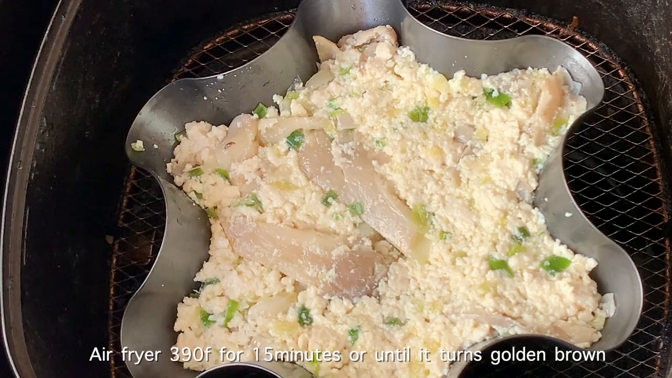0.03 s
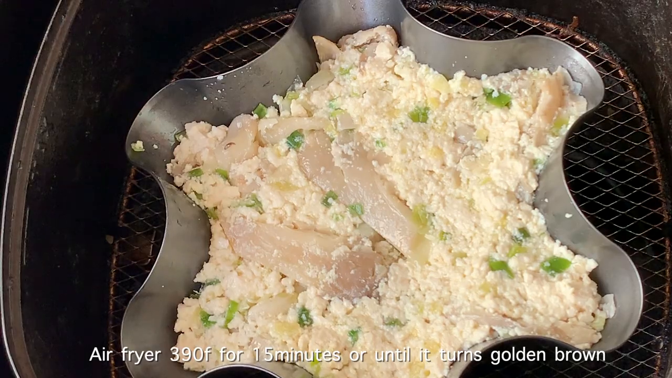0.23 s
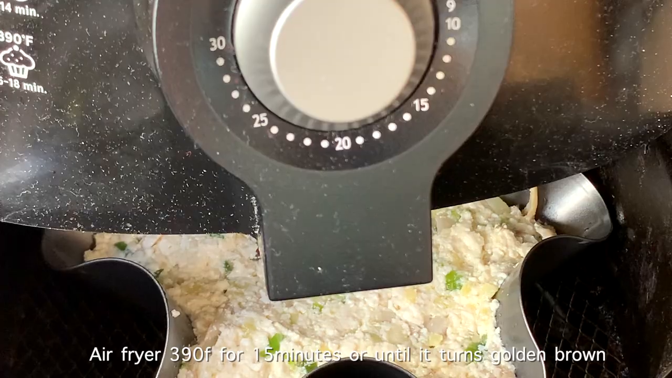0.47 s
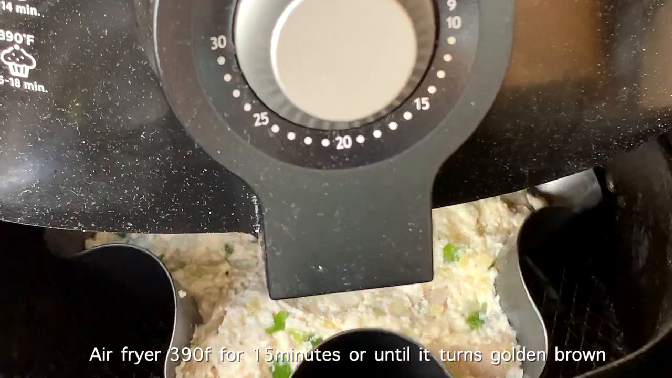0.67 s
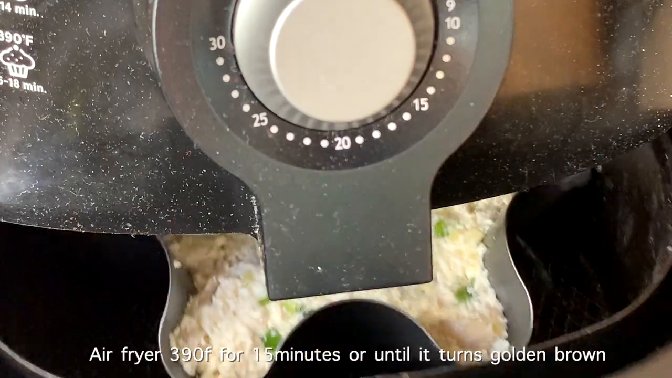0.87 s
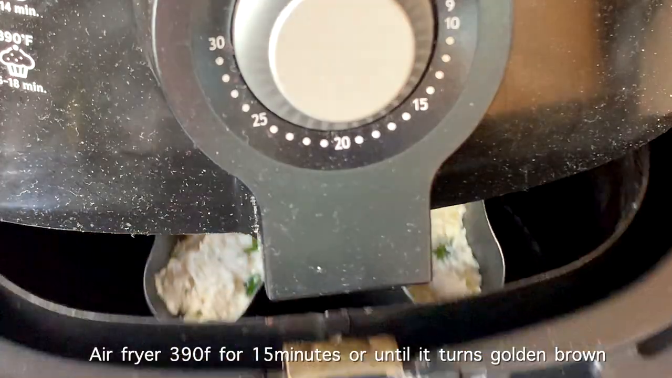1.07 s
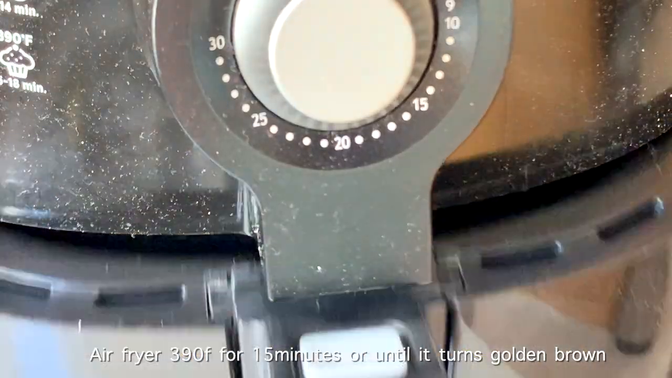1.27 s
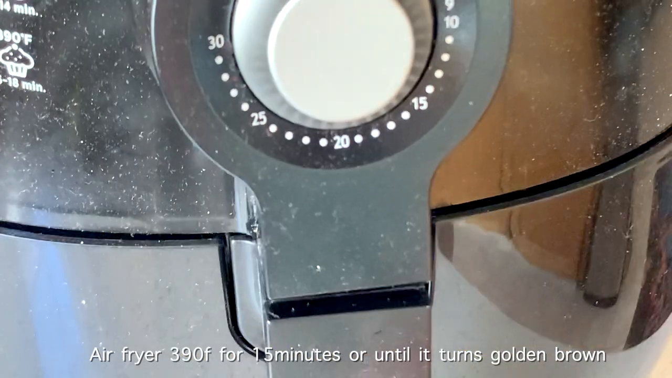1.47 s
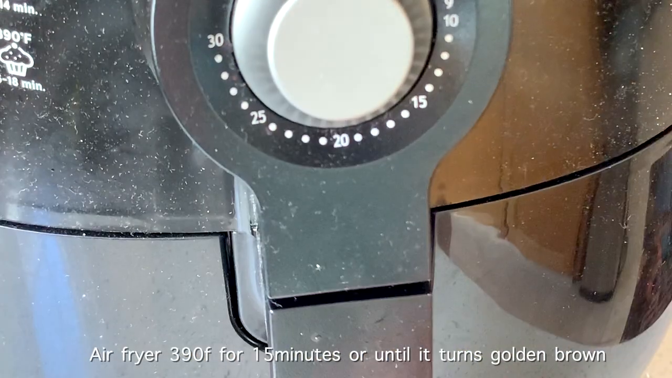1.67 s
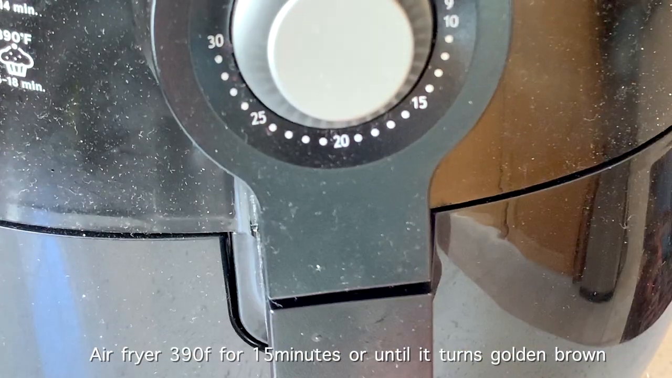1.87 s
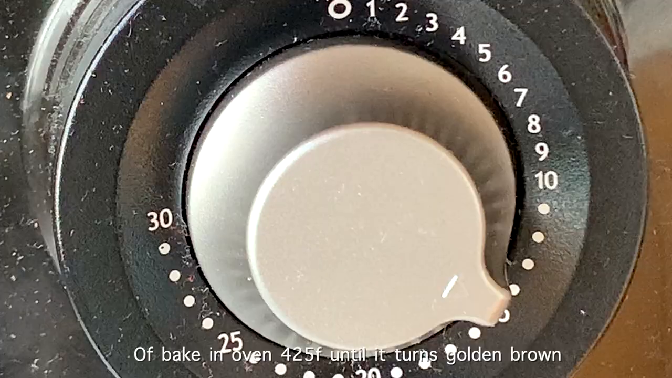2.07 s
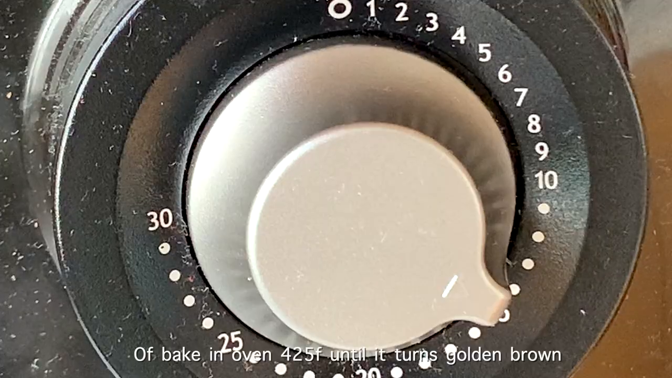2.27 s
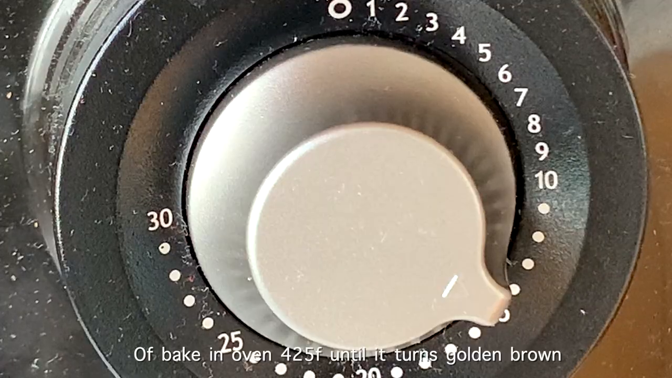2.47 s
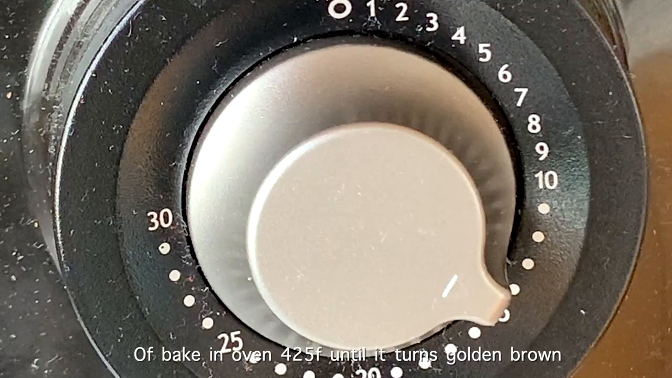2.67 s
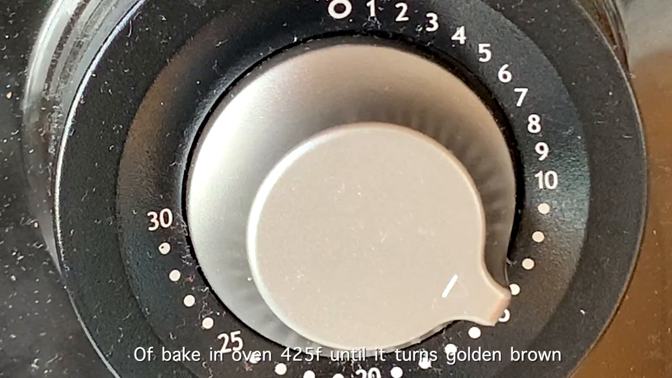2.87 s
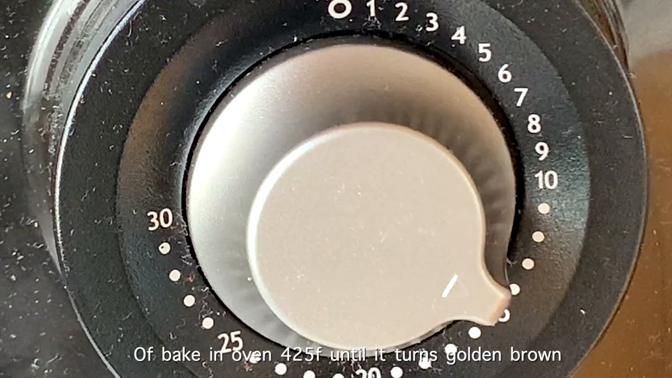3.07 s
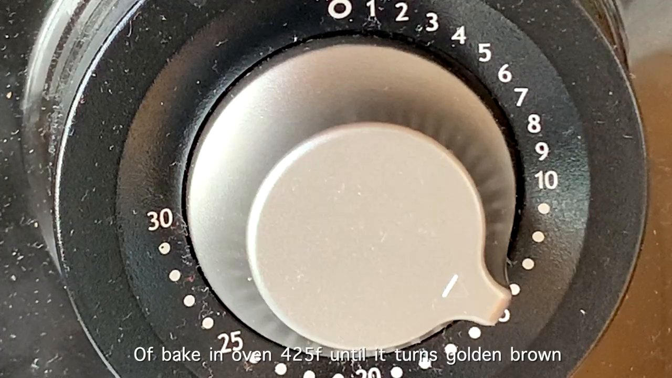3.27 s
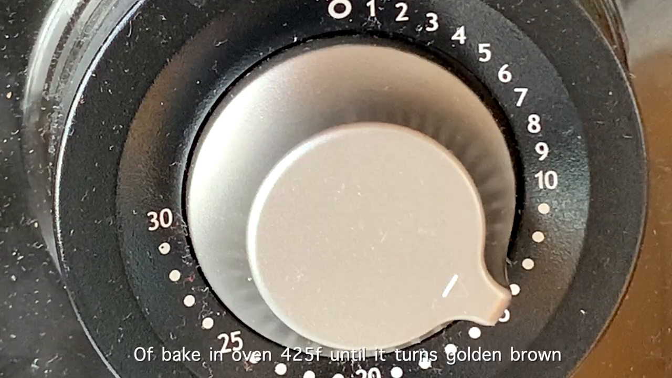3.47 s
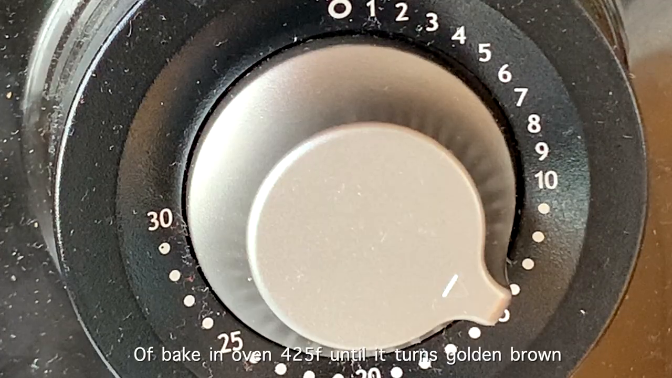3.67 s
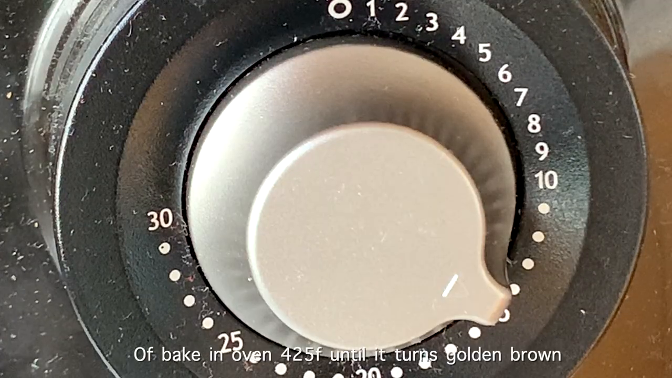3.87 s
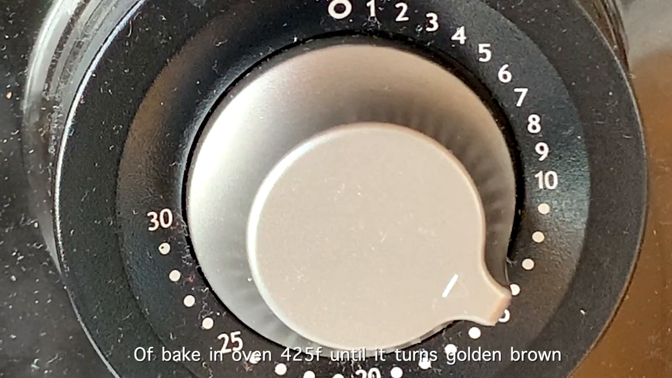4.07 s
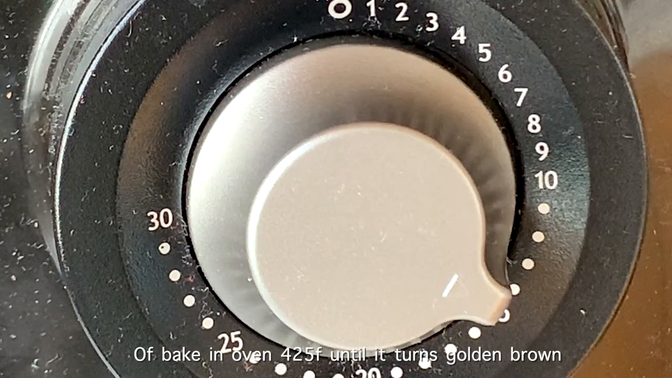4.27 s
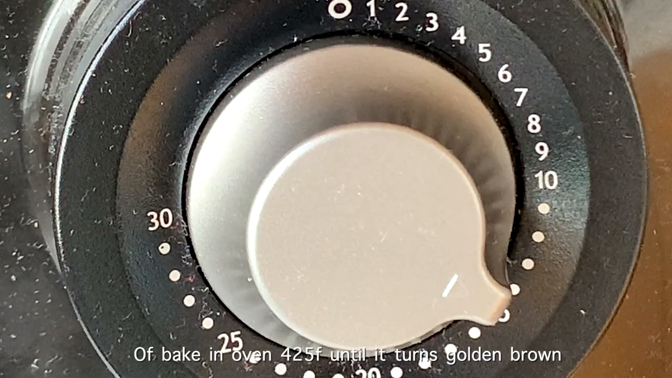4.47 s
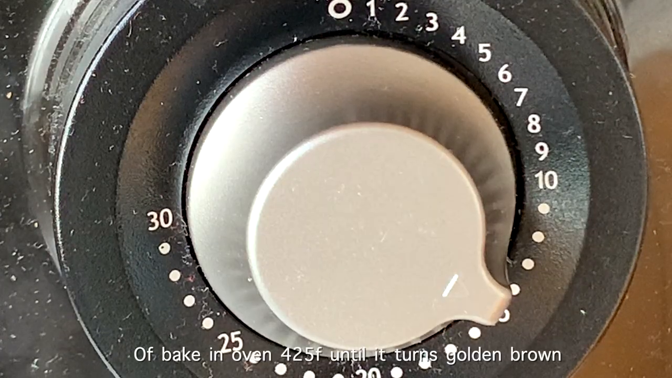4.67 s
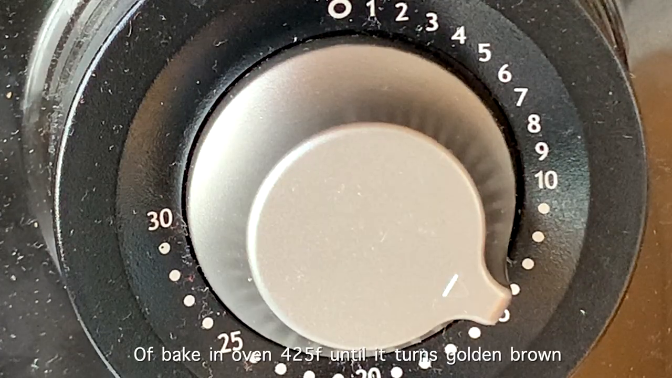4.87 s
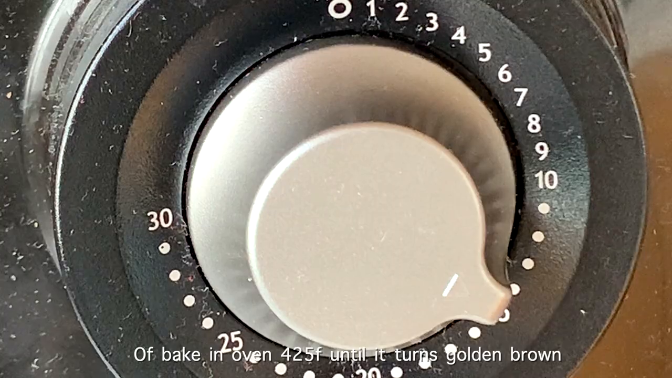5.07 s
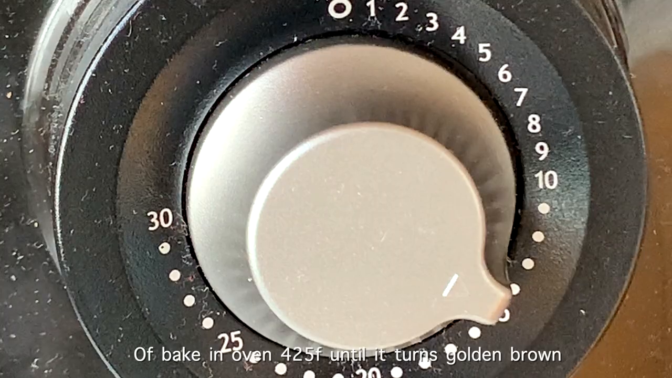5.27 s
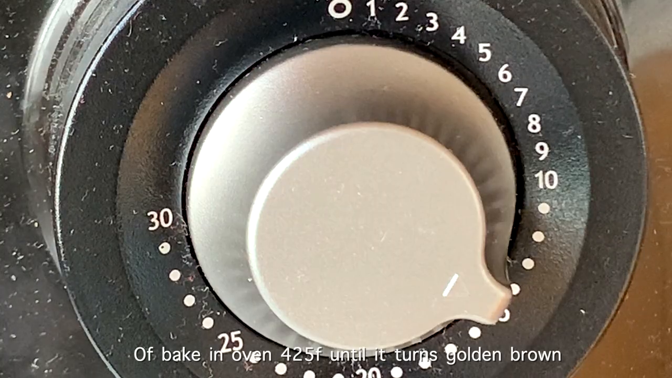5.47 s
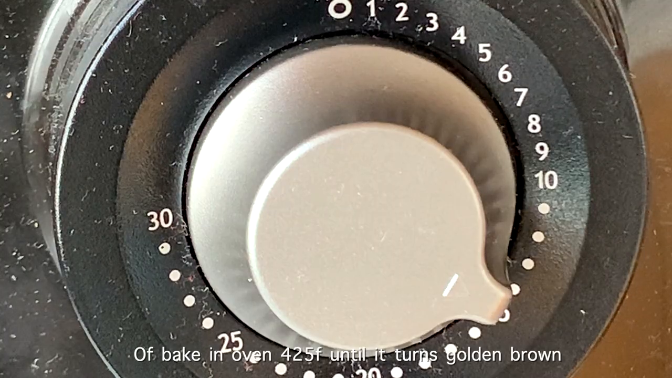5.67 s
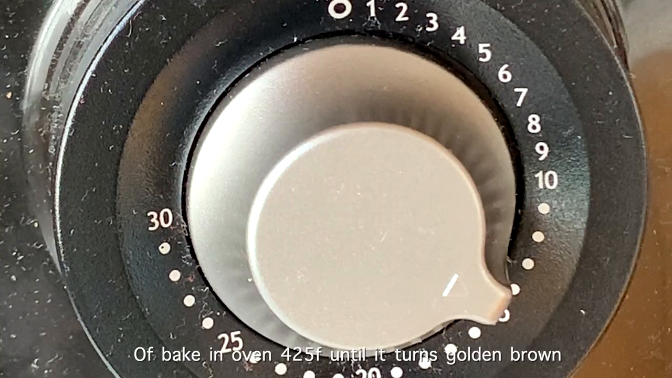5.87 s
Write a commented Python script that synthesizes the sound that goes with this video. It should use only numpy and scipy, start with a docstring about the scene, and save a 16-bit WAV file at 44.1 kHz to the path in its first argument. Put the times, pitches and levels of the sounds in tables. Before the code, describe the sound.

Quiet kitchen, light metallic bumps, a plastic drawer snapping and thumping closed, then an abrupt, steady air fryer whir with a thin hiss.

```python
"""An air fryer's drawer, with a metal pan in it, is pushed home in a small kitchen, then the fan runs. Drawer:
struck modes ring, shaped noise clacks, rubs and snaps as it bumps along the rails, hits the housing and passes
the catches. Fan: coloured noise roars and hisses in the shell, shaft multiples hum and whine, and narrow
resonances whirr; the fan sound comes in abruptly at full level. A hand-held phone gets small bumps; an abrupt
faint click is heard early on; faint kitchen noise lies below."""
import sys
import numpy as np
from scipy import signal
from scipy.fft import rfft, irfft
from scipy.io import wavfile
from scipy.ndimage import uniform_filter1d

SR = 44100
rng = np.random.default_rng(int(sys.argv[2]) if len(sys.argv) > 2 else 0)


def bounce(signal):
    """Save signal as a 16-bit WAV file at the path given by the first command-line argument."""
    frames = np.transpose(np.atleast_2d(signal))
    limited = np.clip(frames, -1, 1)
    pcm = np.round(limited * 32767).astype(np.int16)
    wavfile.write(sys.argv[1], SR, pcm)


N = 261504
T = np.arange(N) / SR
HZ = np.maximum(np.arange(N // 2 + 1) * SR / N, 1)
FAN_ON_S = 2.1035

# plastic clack spectrum: freq_hz, density_db_per_hz
CLACK_SPECTRUM = [(50, -9), (230, 10), (600, 3.5), (950, 2), (1300, 1.5), (1800, -2.5), (2800, -11),
                  (3900, -12.5), (5500, -17), (10000, -25.5), (16000, -42.5)]
# bright snap spectrum: freq_hz, density_db_per_hz
SNAP_SPECTRUM = [(1000, -7.5), (3000, -2), (4000, -7), (6200, -4.5), (9000, -3), (11000, -2), (14000, -6),
                 (16000, -30)]


def basket():
    """Each bump excites pan modes by a landing and random chatter; plastic contacts clack on the rail."""
    # bumps over a rail joint, one foot then the other: landing_s, pan_db, clack_db, snap_db
    bumps = [(0.6627, -34.5, -37.5, -63), (1.0107, -35, -33.5, -40)]
    # graze, landings and rebounds: after_landing_s, level_db
    bump_contacts = [(-.005, -2), (.001, 3.5), (.008, -5), (0.0246, -8.5), (.036, -13)]
    # pan and wire rack modes: freq_hz, t60_s, first_bump_db, second_bump_db
    pan_modes = np.array([(138.3, .25, -16.5, -3.5), (222, 0.58, -3, -16), (256, .17, -1.5, 4.5),
                          (323, 0.28, -11, -2), (348.4, 0.21, -4, -14.5), (462, .18, 0, -7.5),
                          (502, 0.13, -11, 0.5), (610, .09, -9, -1), (730, 0.14, -2, 3),
                          (856, 0.11, -8.5, -4), (971, .12, -2, -6.5), (1084, .1, -19.5, -4.5),
                          (1230, 0.13, -9, -8), (1400, .11, -12.5, -2.5), (1540, .1, -14, -6.5),
                          (1900, .1, -21.5, -4), (2060, 0.11, -8, -6.5), (2600, .11, -14.5, -15),
                          (3400, .1, -21, -21.5), (4100, .08, -18, -14)])
    # rail clack spectrum: freq_hz, density_db_per_hz
    rail_clack = [(70, -3), (230, 4), (600, 5.5), (1300, 1.5), (2000, -1.5), (2800, -9), (4000, -10.5),
                  (5500, -18), (10000, -31), (16000, -44.5)]
    # soft touch before the push: start_s, level_db
    touches = [(.378, -47.5)]
    # modes stirred by the touch: freq_hz, level_db, t60_s
    touch_modes = [(460, -1, 0.13), (590, -10, 0.072), (730, -5, 0.061)]
    chatter_per_s, chatter_db, chatter_t60_s = 240, -13, 0.15  # level against the landing

    pan = 0
    for foot, (at, db, _, _) in enumerate(bumps):
        chatter = bursts([at], [chatter_db], rise=.002, t60=chatter_t60_s)
        force = ticks(chatter_per_s, scatter_db=-1) * chatter
        force[int(at * SR)] += 1
        struck = zip(pan_modes[:, 0], pan_modes[:, 2 + foot], pan_modes[:, 1])
        response = ring(0, db, struck, rise=.002)[:SR]
        pan = pan + signal.fftconvolve(force, response)[:N]

    contacts = [(at + lag, db + step) for at, _, db, _ in bumps for lag, step in bump_contacts]
    contact_s, clack_db = np.transpose(contacts)
    clack = noise(across(rail_clack)) * bursts(contact_s, clack_db, rise=0.00046, t60=0.073)
    clack = clack * grit(rate=450, depth=0.35, t60=0.01)
    landing_s, _, _, snap_db = np.transpose(bumps)
    snap = noise(across(SNAP_SPECTRUM)) * bursts(landing_s, snap_db, rise=.0005, t60=0.02)
    touch = sum(ring(at, db, touch_modes, rise=0.019) for at, db in touches)
    return pan + clack + snap + touch


def rails():
    """Plastic sticks and slips in uneven grains and ticks over burrs, louder with speed and a tighter fit."""
    # rubbing spectrum: freq_hz, density_db_per_hz
    rub_spectrum = [(60, 6.5), (130, 12.5), (250, 4), (700, -3.5), (2000, -8.5), (4500, -11), (8500, -16.5),
                    (11000, -15.5), (14000, -18.5), (16000, -39.5)]
    # drawer gripped, breaking loose, squeezing past the catches: start_s, attack_s, hold_s, level_db
    scrape_events = [(0.184, 0.028, 0.042, -71.5), (0.31, 0.028, 0.027, -75), (0.529, 0.15, 0.024, -55.5),
                     (1.329, 0.04, 0.065, -34)]
    push_start_s, speed_up_s, push_stop_s, brake_s = 0.64, 0.26, 1.42, 0.016
    glide_db = -53  # at full speed, before the fit tightens
    enter_s, tighten_db_per_s = 1.143, 45.5  # inside the opening
    scrape_t60_s = 0.147
    burrs_per_s, burr_db = 70, -9  # level against the rubbing

    speed = ramp(push_start_s, speed_up_s) * (1 - ramp(push_stop_s, brake_s))
    inside_s = np.clip(T, enter_s, push_stop_s) - enter_s
    glide = speed ** 2 * undb(glide_db + tighten_db_per_s * inside_s)
    scrapes = 0
    for start, attack, hold, db in scrape_events:
        tail = fade(np.maximum(T - start - attack - hold, 0), scrape_t60_s)
        scrapes = scrapes + undb(db) * ramp(start, attack) ** 2 * tail

    grains = rng.standard_normal((2, N)) * undb(5 * rng.standard_normal(N))
    rubbing = unit(colour(spread(grains), across(rub_spectrum))) * undb(1.4 * walk(35))
    burrs = undb(burr_db) * noise(across(rub_spectrum)) * grit(burrs_per_s, depth=1, t60=.02)
    return (rubbing + burrs) * (glide + scrapes)


def judder():
    """Low stick-slip groans of the tight drawer body, as sines under smooth swells."""
    # groans just before the catches: centre_s, width_s, pitch_hz, level_db
    groans = [(1.305, .012, 235, -41), (1.337, .016, 195, -34)]
    return sum(np.sin(2 * np.pi * hz * T) * swell(s, width, db) for s, width, hz, db in groans)


def lip():
    """The drawer's lip knocks on the opening: hollow modes ring, plastic rattles, the first knock clicks."""
    # knocks on the edge of the opening: start_s, ring_db, rattle_db
    knocks = [(1.2195, -42, -27.5), (1.227, -9.5, -34.5)]
    # lip modes: freq_hz, level_db, t60_s
    lip_modes = [(96.1, -22.5, 0.1), (141, -12.5, 0.14), (205, -2.5, 0.055), (256, 11, 0.026),
                 (310, -1, 0.03), (405, -8.5, 0.11), (716, -19, 0.16), (2490, -28.5, .1),
                 (3030, -21.5, 0.099)]
    # rattle spectrum: freq_hz, density_db_per_hz
    rattle_spectrum = [(400, -2), (1000, -1.5), (1600, -12.5), (2600, -2.5), (4200, -7), (6000, -13),
                       (10500, -20), (16000, -32.5)]
    start_s, ring_db, rattle_db = np.transpose(knocks)
    rattle = noise(across(rattle_spectrum)) * bursts(start_s, rattle_db, rise=.0005, t60=0.1)
    rattle = rattle * grit(rate=360, depth=0.4, t60=0.005)
    click = noise(across(SNAP_SPECTRUM)) * bursts(start_s[:1], [-32], rise=.001, t60=.02)
    return click + rattle + sum(ring(at, db, lip_modes, rise=0.006) for at, db in zip(start_s, ring_db))


def catches():
    """Sprung catches snap over their ramps, each at its own resonance; the plastic around them clacks."""
    # catch snaps: start_s, level_db, resonance_hz, tilt_db_per_octave
    snap_events = [(1.354, -20.5, 3700, 2.5), (1.3559, -17, 5900, 8.5), (1.3596, -20, 3640, -0.5),
                   (1.492, -17.5, 4950, -2.5)]
    resonance_width_hz, resonance_db = 870, 10.5
    clack_db = -18  # relative to the snap

    snap = 0
    for at, db, hz, tilt in snap_events:
        resonance = resonance_db / (1 + (2 * (HZ - hz) / resonance_width_hz) ** 2)
        tone = across(SNAP_SPECTRUM) + tilt * np.log2(HZ / hz) + resonance
        snap = snap + noise(tone) * bursts([at], [db], rise=0.00025, t60=0.042)
    start_s, snap_db = np.transpose(snap_events)[:2]
    clack = noise(across(CLACK_SPECTRUM)) * bursts(start_s, snap_db + clack_db, rise=0.00046, t60=0.19)
    return snap + clack * grit(rate=300, depth=0.44, t60=.008)


def closing():
    """Rims crack and clack, the shell rings at a pitch set by the strike point, the drawer's mass thumps."""
    # drawer strikes the housing: start_s, pitch_ratio, ring_db, clack_db, crack_db
    slams = [(1.3688, .97, -26, -23, -23.5), (1.3875, 0.95, -28.5, -27.5, -26),
             (1.4049, 1.0, -17, -24, -24), (1.4112, 1.0, -25, -31, -33.5), (1.4218, 0.85, -37, -35, -36.5),
             (1.5072, 1.04, -21.5, -21.5, -27), (1.5163, .98, -22.5, -19.5, -29.5)]
    # the drawer's mass follows into the housing: start_s, pitch_hz, level_db, t60_s
    thumps = [(1.366, 168, -22, .14), (1.4128, 177, -11, .19), (1.51, 146, -22, .17),
              (1.5195, 250, -11, .03)]
    # shell modes at pitch ratio 1: freq_hz, level_db, t60_s
    shell_modes = np.array([(176, -9.5, 0.1), (313, -11.5, 0.078), (337.5, 6.5, 0.063), (406, -1, 0.074),
                            (622, -1, 0.07), (667, 2.5, 0.049), (704, -9.5, 0.025), (862, -20.5, 0.2),
                            (1070, -19.5, 0.11), (1360, -31, .08), (1720, -20, 0.073), (2240, -31.5, 0.067),
                            (3280, -29.5, .15), (3590, -22.5, 0.045)])
    # rim crack spectrum: freq_hz, density_db_per_hz
    crack_spectrum = [(300, -3.5), (1000, -5), (1800, -6.5), (3500, -1), (7000, -14), (16000, -24)]
    # closed drawer settles: start_s, level_db
    settle = [(1.553, -23.5)]
    # housing modes that hum on: freq_hz, level_db, t60_s
    housing_modes = [(59, -15, .9), (92, -5.5, .25), (135, -19, .9), (155, -1.5, .34), (155.8, -16, 1.7)]
    # faint murmur of the closed housing: freq_hz, width_hz, level_db, right_lag_deg
    murmur_resonances = [(160, 40, -59, 0), (310, 90, -75, 0), (450, 60, -83, 0), (615, 90, -82, 0)]
    edge_db = -7  # relative to the crack

    start_s, pitch, ring_db, clack_db, crack_db = np.transpose(slams)
    thump = sum(ring(at, db, [(hz, 0, t60)], rise=0.0013) for at, hz, db, t60 in thumps)
    shell = sum(ring(at, db, shell_modes * [ratio, 1, 1])
                for at, ratio, db in zip(start_s, pitch, ring_db))
    crack = noise(across(crack_spectrum)) * bursts(start_s, crack_db, rise=0.00022, t60=0.021)
    clack = noise(across(CLACK_SPECTRUM)) * bursts(start_s, clack_db, rise=0.00035, t60=0.062)
    clack = clack * grit(rate=290, depth=0.33, t60=.008)
    edge = noise(across(SNAP_SPECTRUM)) * bursts(start_s, crack_db + edge_db, rise=0.00023, t60=0.018)
    hum = sum(ring(at, db, housing_modes, rise=0.0042) for at, db in settle)
    murmur = stirred(murmur_resonances) * ramp(settle[0][0], 0.011) * (T < FAN_ON_S)
    return thump + shell + crack + clack + edge + hum + murmur


def fan():
    """Turbulent air resounds in the shell and hisses through the vent; motor hums, blades whine, grille rings."""
    # air in the shell: freq_hz, density_db_per_hz
    air_spectrum = [(25, -10), (50, -4), (130, 3), (250, 3.5), (420, -1), (620, -5.5), (900, -4.5),
                    (1400, -9), (2150, -12), (2700, -16.5), (4700, -17), (5400, -21), (7000, -39),
                    (16000, -47)]
    # cavity and panel resonances, and dips between: freq_hz, width_hz, lift_db
    cavity = [(51, 15, 9), (114, 19, 1), (133.3, 48, 5), (167.6, 66.7, 17), (237, 23, -3.5),
              (291.8, 54, 10.5), (348, 18, 4.5), (382.5, 16, 8.5), (462, 23, 5), (839, 38, 2.5),
              (1023, 43, 4.5), (1118, 37, 7), (1170, 64, -3.5), (1395, 130, 4.5), (1680, 240, 3.5)]
    # vent hiss: freq_hz, density_db_per_hz
    hiss_spectrum = [(2500, -2), (5000, -12), (5700, 6), (7800, 4.5), (8700, 8), (10350, -1), (11000, 4.5),
                     (11400, -6), (12000, 1), (13600, -0.5), (14400, -8), (14900, 1), (16000, -12)]
    # thin sizzle: freq_hz, density_db_per_hz
    sizzle_spectrum = [(2500, -1), (6000, 0.5), (10000, -4), (13000, 2), (14500, -4), (16000, -1)]
    # sizzle swells: centre_s, level_db
    sizzle_swells = [(4.745, -47), (5.48, -56)]
    # air buffets the shell: centre_s, level_db
    surge_swells = [(2.733, -25), (5.035, -27), (5.497, -29)]
    # motor hum and blade whine: shaft_multiple, level_db
    orders = [(1, -60), (2, -52), (6, -49), (11, -41.5), (22, -63)]
    # fan wheel and grille rings: freq_hz, width_hz, level_db, right_lag_deg
    whirr_resonances = [(1383, 18, -57.5, 30), (1785, 16, -61.5, -20), (1988, 34, -64, 35),
                        (2058, 34, -64.5, 35), (2265, 60, -66, -35), (2378, 34, -61.5, 10),
                        (2475, 65, -64, -70), (2810, 45, -69, -60), (2920, 60, -68.5, 45),
                        (3090, 120, -66, -55), (3300, 130, -64, -80), (3520, 70, -68.5, -5),
                        (3745, 50, -69, -100), (3850, 60, -70.5, -15), (4240, 70, -73, -110),
                        (4420, 110, -68.5, -15), (4630, 130, -63, -120), (5020, 100, -68, -65),
                        (5820, 110, -72, -130)]
    roar_db, hiss_db, roar_flutter_db = -32.5, -55.5, .5
    shaft_hz, surge_hz = 49.78, 160
    surge_width_s, sizzle_width_s = .012, 0.094  # from the top of a swell to 1/e

    lift = sum(db / (1 + (2 * (HZ - hz) / width) ** 2) for hz, width, db in cavity)
    roar = undb(roar_db) * noise(across(air_spectrum) + lift) * undb(roar_flutter_db * walk(14))
    hiss = undb(hiss_db) * noise(across(hiss_spectrum))
    sizzle_level = sum(swell(s, sizzle_width_s, db) for s, db in sizzle_swells)
    sizzle = noise(across(sizzle_spectrum)) * sizzle_level
    air = roar + hiss + sizzle

    surge_level = sum(swell(s, surge_width_s, db) for s, db in surge_swells)
    surges = np.sin(2 * np.pi * surge_hz * T) * surge_level
    turns = np.cumsum(shaft_hz * (1 + 0.00068 * walk(4.93))) / SR
    whine = sum(np.sqrt(2) * undb(db + .5 * walk(11)) * np.sin(2 * np.pi * k * turns) for k, db in orders)
    whirr = stirred(whirr_resonances, flutter_db=2.5, waver=.0015)
    running = air + kitchen(air, wet_db=-4.0, bass_hz=1750) + surges + whine + whirr
    return running * ramp(FAN_ON_S, 0.00073)


def handling():
    """Finger scuffs of shaped noise, and dull low rings as the hand bumps the phone."""
    # fingers scuff over the handle: centre_s, width_s, level_db
    scuffs = [(.25, .04, -72), (.382, .036, -64.5)]
    # scuff spectrum: freq_hz, density_db_per_hz
    scuff_spectrum = [(1000, -26), (1600, -5), (2100, 1), (2700, -13), (3600, -5), (5000, -15),
                      (11000, -17), (16000, -5.5)]
    # hand bumps the phone: start_s, pitch_hz, level_db
    hand_bumps = [(3.582, 61, -20.5), (3.725, 57, -27), (3.851, 62, -30)]
    scuff = noise(across(scuff_spectrum)) * sum(swell(*row) for row in scuffs)
    return scuff + sum(ring(s, db, [(hz, 0, .2)], rise=0.0038) for s, hz, db in hand_bumps)


def abrupt_click():
    """An abrupt faint click: three sines that die away within milliseconds."""
    # abrupt faint click: start_s, level_db
    clicks = [(.3372, -46)]
    partials = [(250, 0, .008), (900, -2, .003), (2500, -5, .002)]  # freq_hz, level_db, t60_s
    return sum(ring(s, db, partials, rise=.0001) for s, db in clicks)


def kitchen(x, wet_db, bass_hz):
    """Diffuse echo of hard walls: noise bands with their own decay, short in the treble, weak in the bass."""
    # room decay: freq_hz, t60_s
    room_decay = [(100, 0.58), (600, 0.41), (1500, 0.54), (5000, 0.48), (9000, 0.42), (16000, 0.24)]
    edges_hz = np.geomspace(100, 16000, 9)
    echo = rfft(spread(rng.standard_normal((2, N)))) * HZ / np.hypot(HZ, bass_hz)
    t = T[:SR]
    tail = 0
    for lo, hi in zip(edges_hz, edges_hz[1:]):
        band = irfft(echo * ((HZ >= lo) & (HZ < hi)), N)[:, :SR]
        tail = tail + band * fade(t, across(room_decay, np.sqrt(lo * hi)))
    tail = tail * np.clip(t / 0.00077, 0, 1)
    tail = tail / np.sqrt(np.sum(tail ** 2) / 2)
    return undb(wet_db) * signal.fftconvolve(x, tail, axes=1)[:, :N]


def quiet_room():
    """Low rumble of the kitchen: coloured noise with a slow random drift in level."""
    # background spectrum: freq_hz, density_db_per_hz
    quiet_spectrum = [(25, 1.5), (55, 5), (115, 0.5), (250, -10), (500, -23), (1000, -30.5), (4000, -36.5),
                      (16000, -40)]
    return undb(-61.5) * noise(across(quiet_spectrum)) * undb(1.2 * walk(4.1))


def undb(db):
    """Decibels to gain."""
    return 10 ** (np.asarray(db) / 20)


def unit(x):
    """Scale to rms 1."""
    return x / np.sqrt(np.mean(x ** 2))


def across(points, hz=HZ):
    """Interpolate (Hz, value) points on a log-frequency axis."""
    f, value = np.transpose(points)
    return np.interp(np.log(hz), np.log(f), value)


def colour(x, db):
    """Filter by a gain in dB at every frequency."""
    return irfft(rfft(x) * undb(db), N)


def spread(x, apart_hz=1000):
    """Two unrelated signals to left and right: long waves reach both ports alike, short ones do not."""
    ratio = (HZ / apart_hz) ** 2
    apart = np.clip(ratio / (1 + ratio) + 0.025, 0, 1)
    mid, side = rfft(x) * np.sqrt([1 - apart / 2, apart / 2])
    return irfft(np.array([mid + side, mid - side]), N)


def noise(db):
    """Stereo noise of a given colour, rms 1."""
    return unit(colour(spread(rng.standard_normal((2, N))), db))


def walk(rate):
    """Smooth random drift, rms 1, from held draws at rate per s, averaged twice."""
    k = int(SR / rate)
    steps = np.repeat(rng.standard_normal(N // k + 1), k)
    return unit(uniform_filter1d(uniform_filter1d(steps, k), k)[:N])


def fade(t, t60):
    """Exponential decay by 60 dB in t60 seconds."""
    return np.exp(-np.log(1000) * t / t60)


def ramp(start, length):
    """Rise evenly from 0 to 1."""
    return np.clip((T - start) / length, 0, 1)


def swell(s, width, db):
    """Gaussian rise and fall around time s."""
    return undb(db) * np.exp(-((T - s) / width) ** 2)


def bursts(times, dbs, rise, t60):
    """Envelope of contacts that build up fast and die away."""
    out = np.zeros(N)
    t = T[:SR // 2]
    for s, db in zip(times, dbs):
        out[int(s * SR):][:len(t)] += undb(db) * (1 - np.exp(-t / rise)) * fade(t, t60)
    return out


def ring(s, db, modes, rise=0.0015):
    """Decaying modes struck at time s."""
    out, t = np.zeros(N), T[:SR * 2]
    wave = sum(undb(gain) * np.sin(2 * np.pi * hz * t) * fade(t, t60) for hz, gain, t60 in modes)
    out[int(s * SR):][:len(t)] = undb(db) * wave * (1 - np.exp(-t / rise))
    return out


def stirred(resonances, flutter_db=0, waver=0):
    """Randomly driven light resonances: separate flutter, shared pitch waver, a port lag for each."""
    out, clock = 0, T + waver * np.cumsum(walk(3)) / SR
    for hz, width, db, lag_deg in resonances:
        flutter = unit(undb(flutter_db * walk(30)))
        drive = (walk(2 * width) + 1j * walk(2 * width)) * flutter
        wave = undb(db) * drive * np.exp(2j * np.pi * hz * clock)
        lagged = wave * np.exp(-1j * np.radians(lag_deg))
        out = out + np.array([wave.real, lagged.real])
    return out


def ticks(rate, scatter_db):
    """Tiny contacts at random moments, of uneven size."""
    return (rng.random(N) < rate / SR) * undb(scatter_db * rng.uniform(-1.1, 1, N))


def grit(rate, depth, t60):
    """Envelope, rms 1, that breaks a noise into tiny contacts; depth 0 is smooth, 1 is lone ticks."""
    contacts = unit(signal.fftconvolve(ticks(rate, 6), fade(T[:SR // 10], t60))[:N])
    depth = np.clip(depth, 0, 1)
    return unit(1 - depth + depth * contacts)


def scene():
    """Drawer with its echo, then fan, with handling and a click, over the low rumble of the kitchen."""
    drawer = basket() + rails() + judder() + lip() + catches() + closing()
    echo = kitchen(drawer, wet_db=-11.5, bass_hz=197.7)
    return drawer + echo + fan() + handling() + abrupt_click() + quiet_room()


def record(dry):
    """The phone's two ports differ in colour and arrival time; fade in, cut lowest bass and highest treble."""
    # port colour: freq_hz, left_minus_right_db
    port_balance = [(100, 0.5), (200, -1.5), (350, -2), (550, -0.5), (800, 3), (2100, 2), (3000, 1),
                    (6000, -2), (9000, 1.5)]
    left_lead_samples, treble_lag_samples = 4, 13
    shared_hz, low_cut_hz, top_hz = 8500, 42, 15500

    left, right = rfft(dry) * undb(np.outer([1, -1], across(port_balance)) / 2)
    one_sample = np.exp(-2j * np.pi * HZ / SR)
    right = right * one_sample ** left_lead_samples
    # the left takes its top octave from the right, a little late
    share = 1 / (1 + (shared_hz / HZ) ** 8)
    left = np.sqrt(1 - share) * left + np.sqrt(share) * right * one_sample ** treble_lag_samples
    low_cut = signal.butter(3, low_cut_hz, "high", fs=SR, output="sos")
    out = signal.sosfilt(low_cut, irfft(np.array([left, right]), N))
    high_cut = signal.ellip(10, .2, 80, top_hz, fs=SR, output="sos")
    return signal.sosfilt(high_cut, out * np.minimum(T / .02, 1) ** 2)


dry = scene()
out = record(dry)
bounce(out)
```